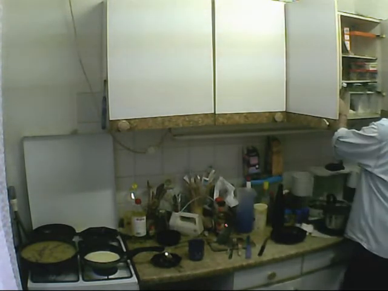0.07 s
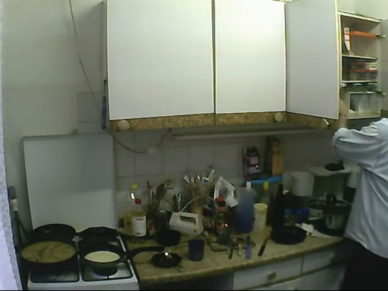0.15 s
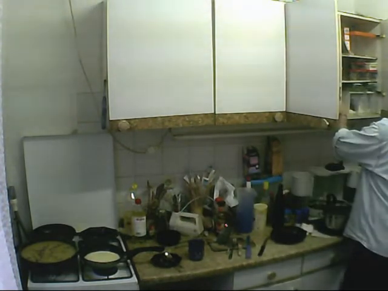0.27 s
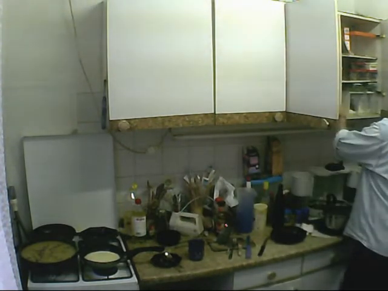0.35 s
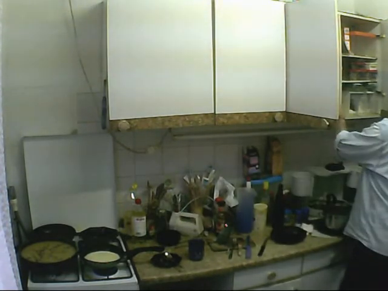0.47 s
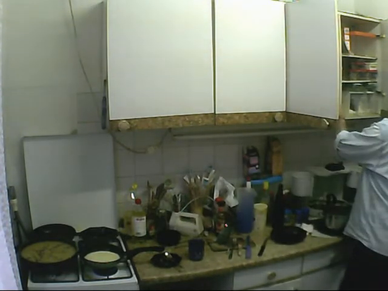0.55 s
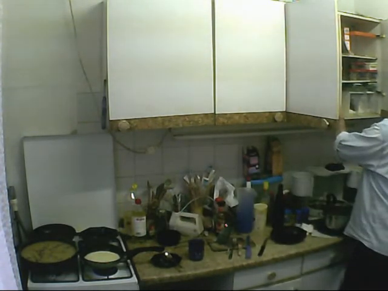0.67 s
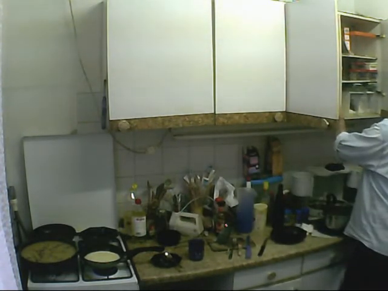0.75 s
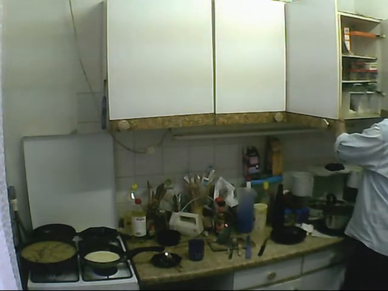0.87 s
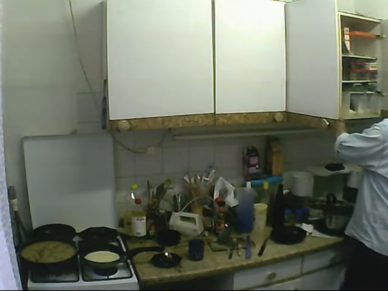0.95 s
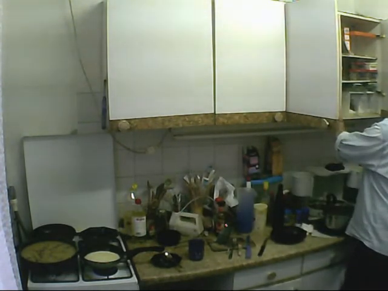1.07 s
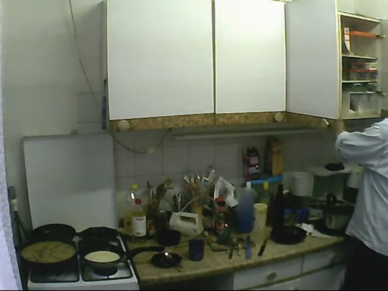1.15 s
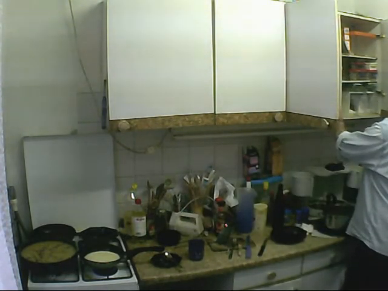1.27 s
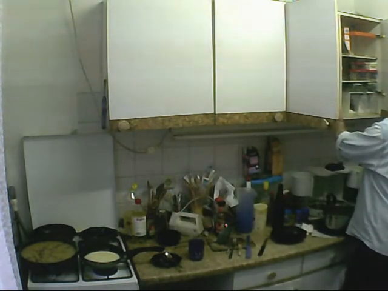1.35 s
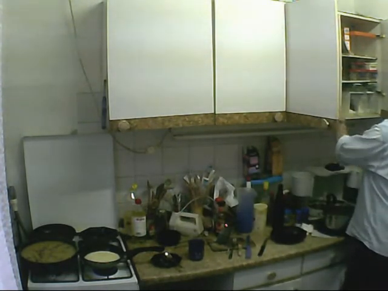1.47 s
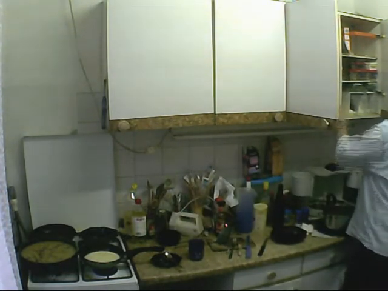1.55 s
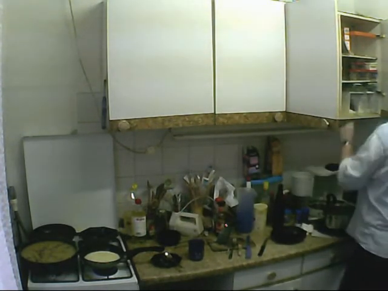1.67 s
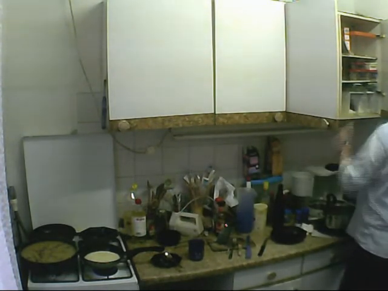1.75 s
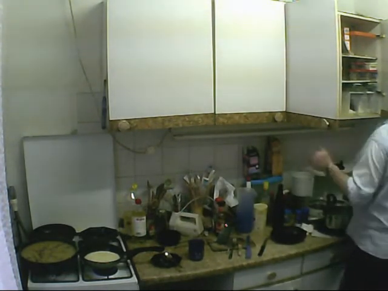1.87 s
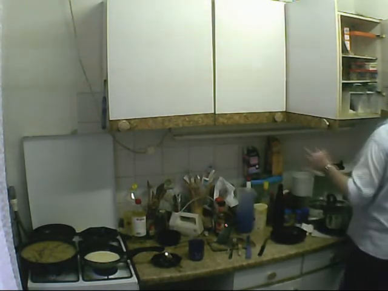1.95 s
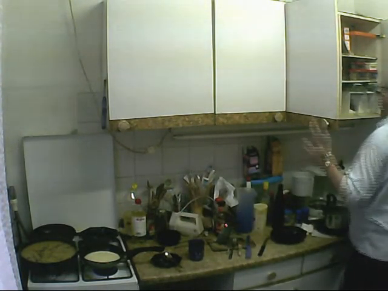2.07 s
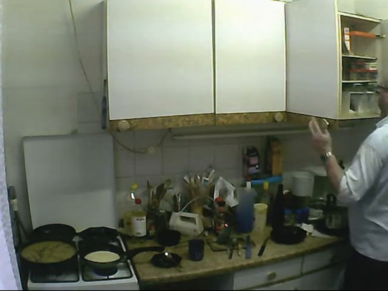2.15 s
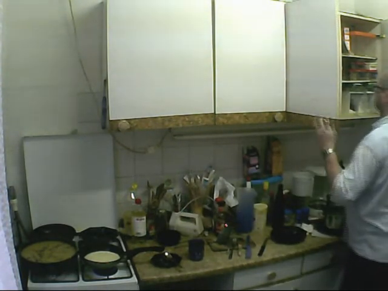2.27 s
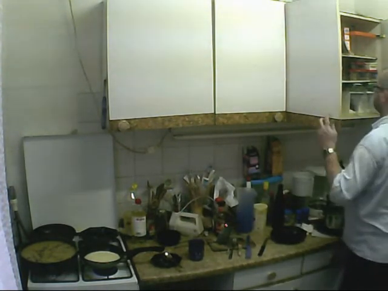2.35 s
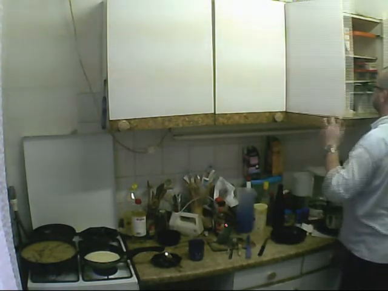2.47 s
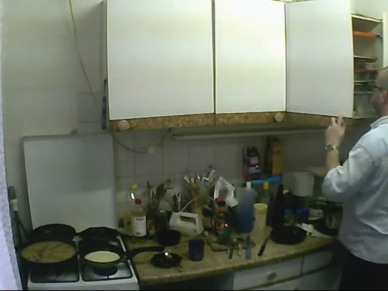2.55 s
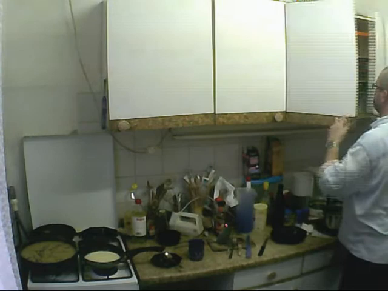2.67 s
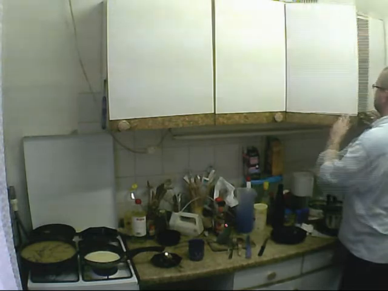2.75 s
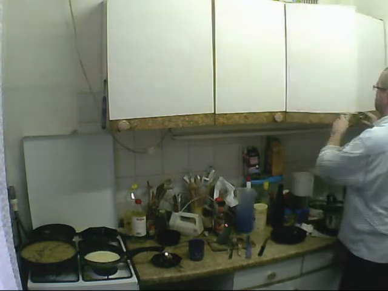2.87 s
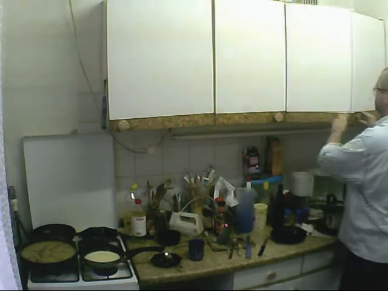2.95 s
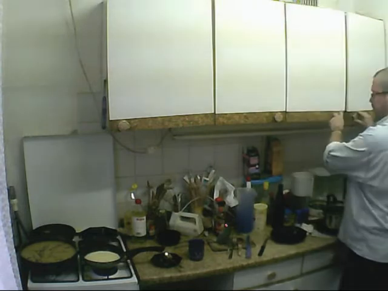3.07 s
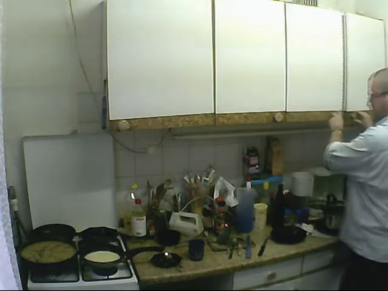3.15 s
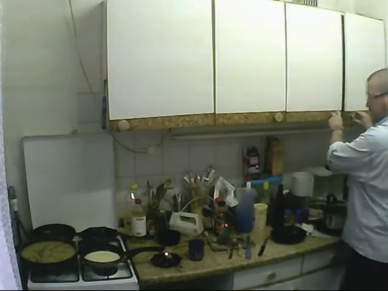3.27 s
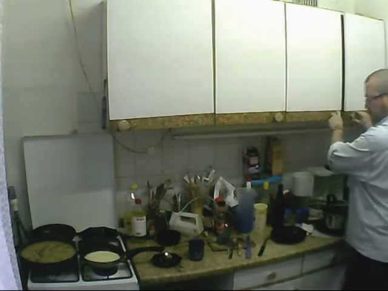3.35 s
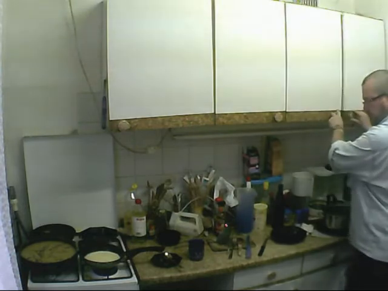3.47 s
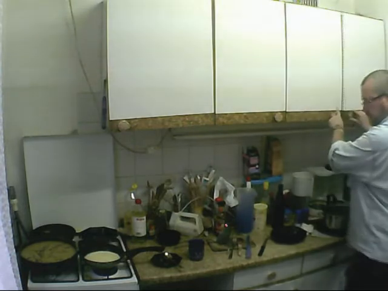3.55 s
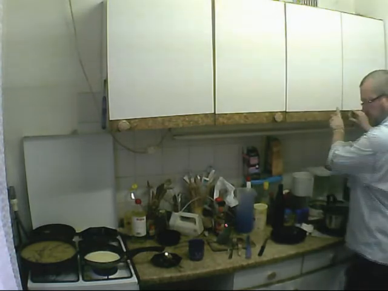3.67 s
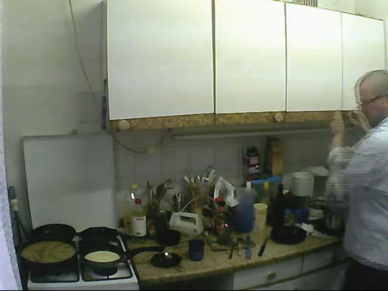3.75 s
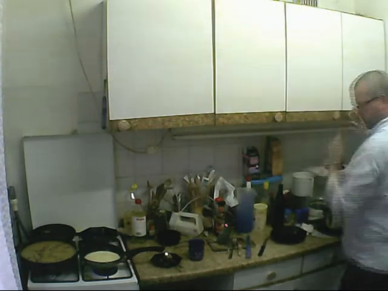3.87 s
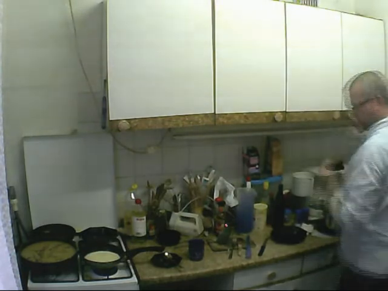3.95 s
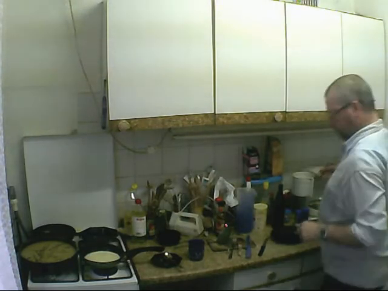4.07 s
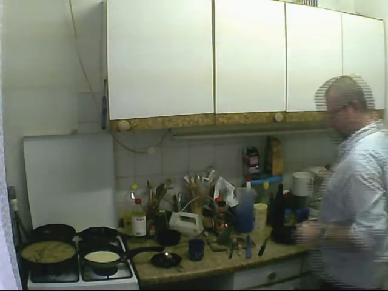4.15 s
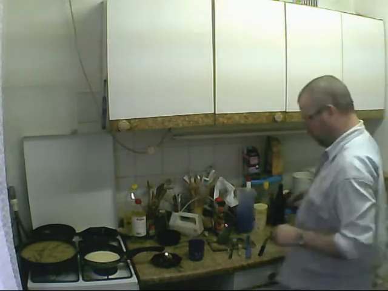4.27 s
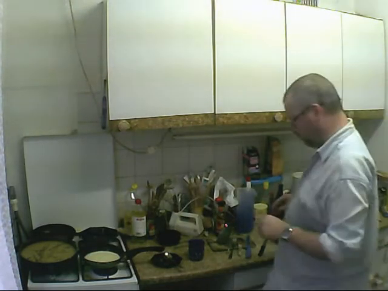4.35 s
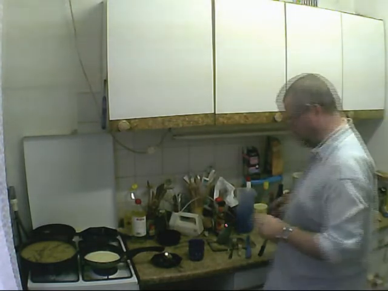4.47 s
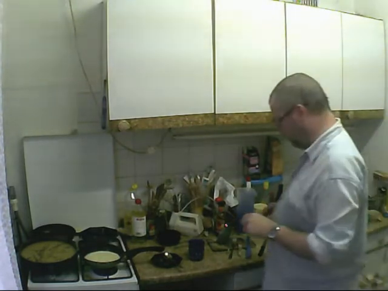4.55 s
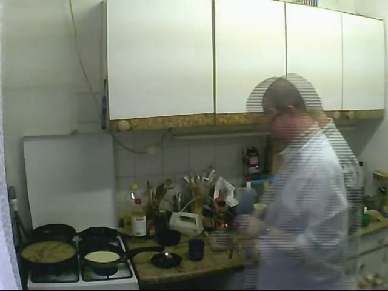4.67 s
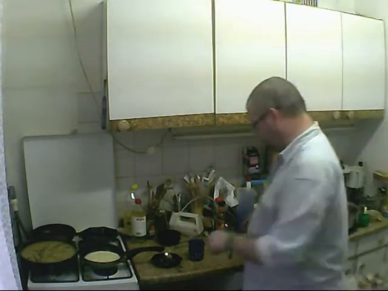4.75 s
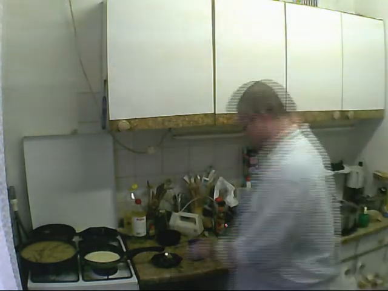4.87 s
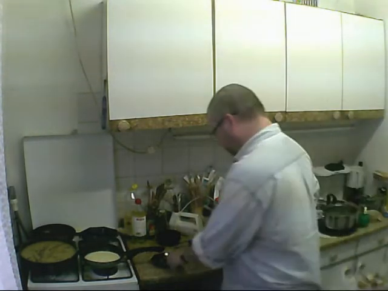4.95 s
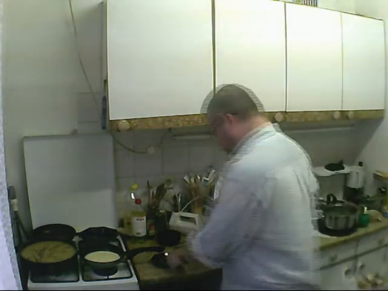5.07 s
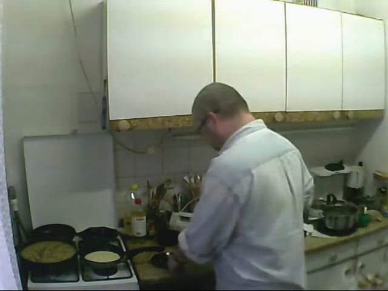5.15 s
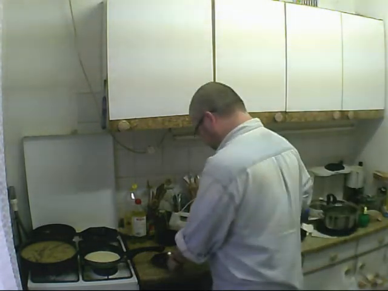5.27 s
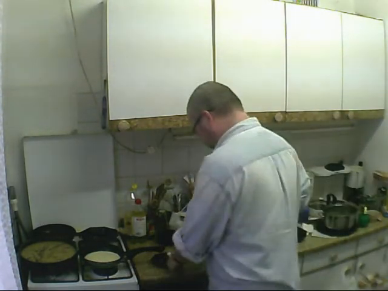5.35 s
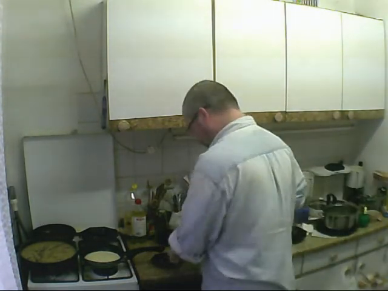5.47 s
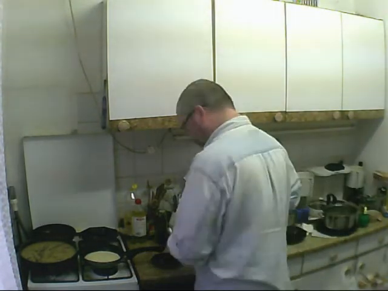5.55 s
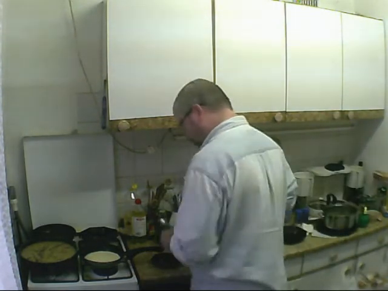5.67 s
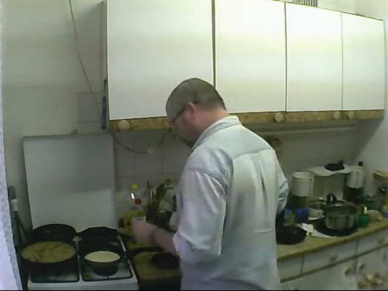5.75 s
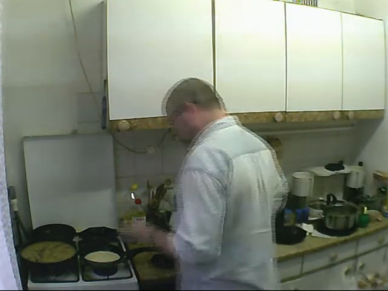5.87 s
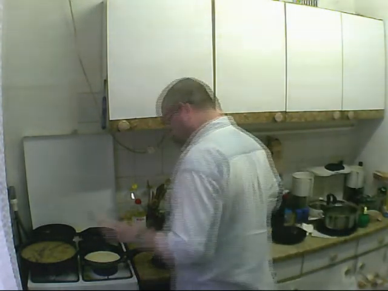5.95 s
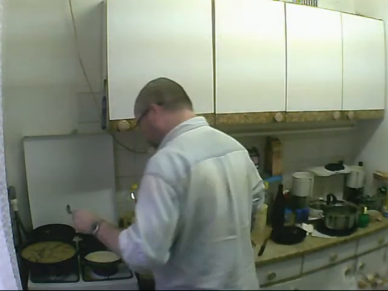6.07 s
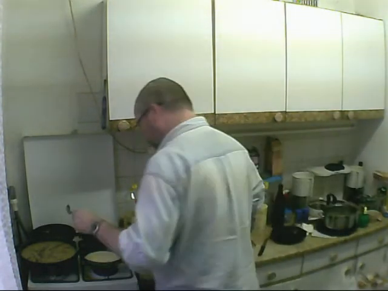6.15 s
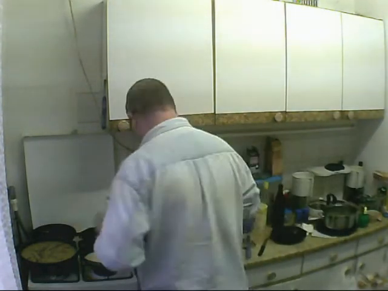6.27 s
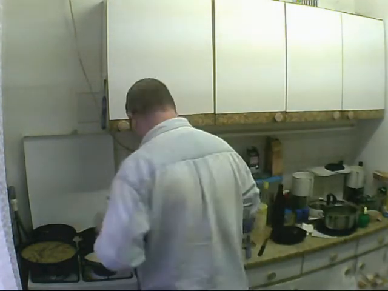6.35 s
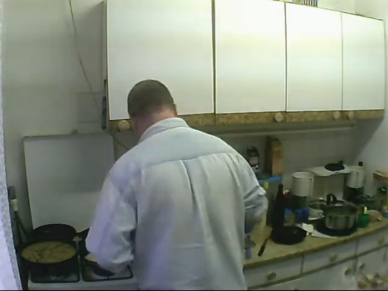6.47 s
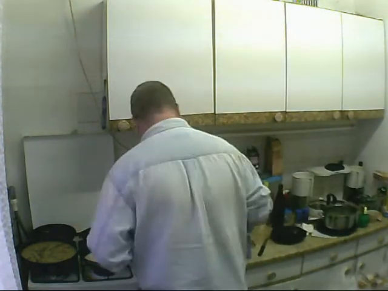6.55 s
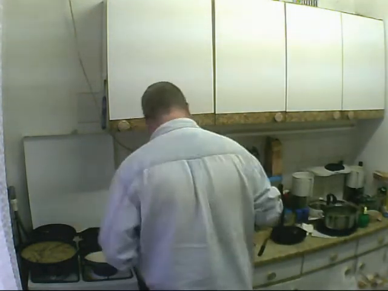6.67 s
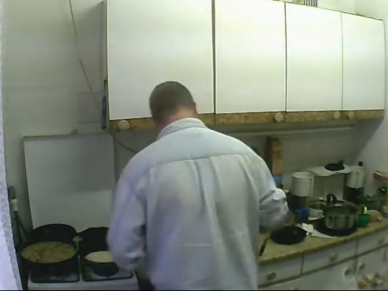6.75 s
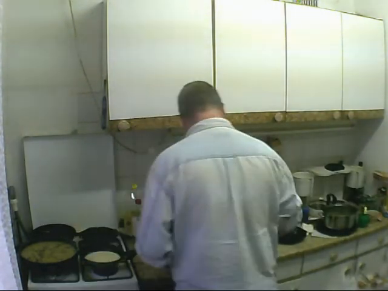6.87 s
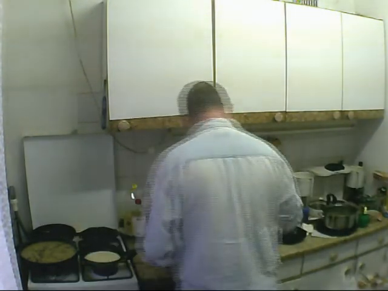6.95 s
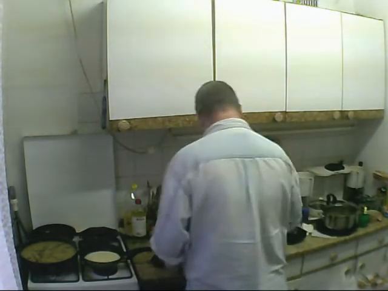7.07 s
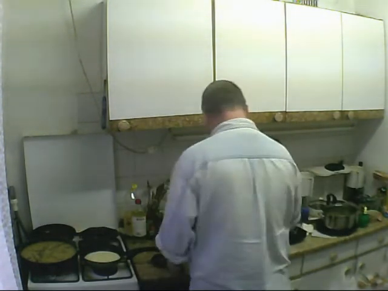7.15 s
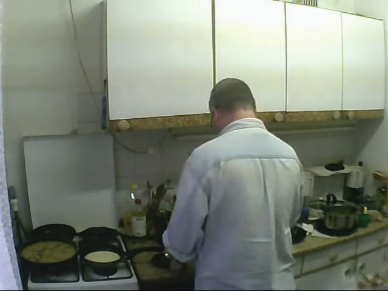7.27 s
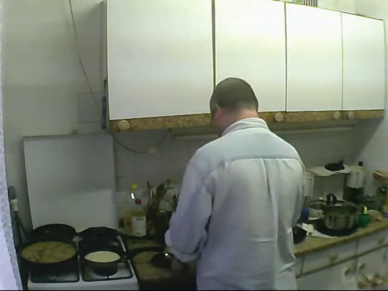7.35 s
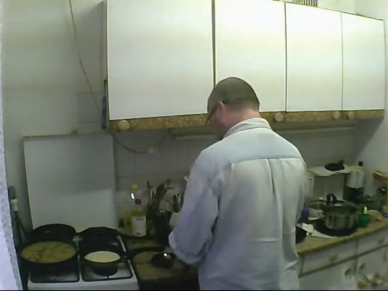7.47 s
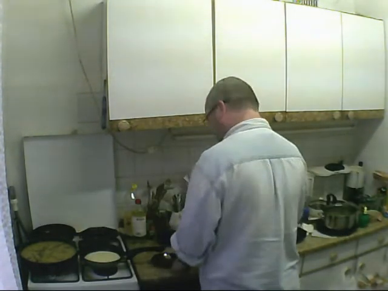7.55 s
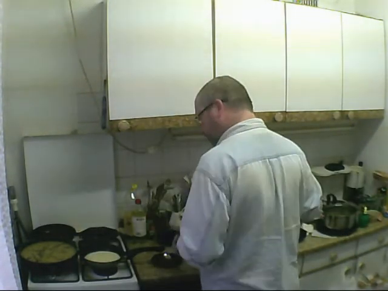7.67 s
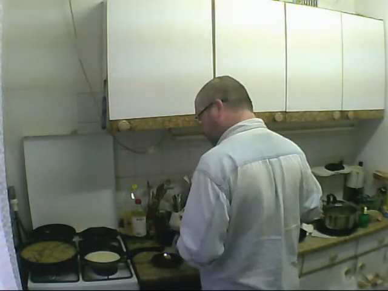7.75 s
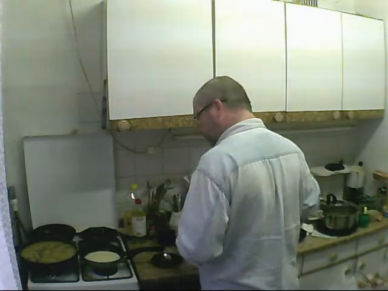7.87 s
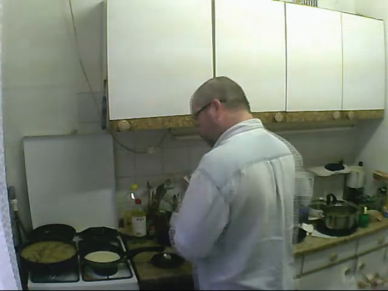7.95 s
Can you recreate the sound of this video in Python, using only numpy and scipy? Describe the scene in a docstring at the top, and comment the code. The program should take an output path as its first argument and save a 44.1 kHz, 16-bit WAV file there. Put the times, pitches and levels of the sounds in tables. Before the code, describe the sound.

In a small kitchen, things knock and slide lightly on a wooden shelf. Cupboard doors are nudged, then two bang shut in quick succession, the second loudest, with a brief crunch. Soft footsteps rumble through the floor and a shirt rustles while items knock on the counter, a glass clinks and a utensil clinks twice. The microphone sounds dull, with a steady mains hum and faint hiss.

```python
"""Two wall cupboard doors are nudged and banged shut in a small tiled kitchen; their panels thump and ring.
Before that, things knock and slide on a shelf. Afterwards things are handled on the counter, and a glass
and a utensil clink. Steps make the floor rumble, a shirt rustles and slams rock the microphone's support.
The microphone hums with the mains and misses the high treble. The hardest slam clips with a brief crunch."""
import sys
import numpy as np
from scipy import signal
from scipy.fft import rfft, irfft
from scipy.io import wavfile

SR = 44100
rng = np.random.default_rng(int(sys.argv[2]) if len(sys.argv) > 2 else 0)


def store_pcm(level_fs):
    """Save levels as 16-bit WAV."""
    pcm = np.round(np.clip(level_fs, -1, 1) * 32767).astype(np.int16)
    wavfile.write(sys.argv[1], SR, np.atleast_2d(pcm).T)


N = 352800
T = np.arange(N) / SR
AGE = T[:SR]  # seconds since a blow
TAP_S = .01  # length of a plain tap
BAND_HZ = 4500  # top of the microphone's range

# Mains hum. Each row: multiple of the mains frequency, level in dB.
HUM = [(1, -38), (3, -50.5), (5, -60)]
# Body movements, and pushes along the shelf. Each row: start in seconds, length in seconds, level in dB.
BODY_MOVES = [(.9, 3.8, -64.5), (3.5, 1.24, -53), (4.5, 1.92, -58), (6.2, 0.96, -57.5)]
PUSHES = [(.76, 0.14, -51.5), (.9, 0.2, -47)]
# Knocks on wood. Each row: start in seconds, wood level in dB, click level in dB, contact in seconds.
SHELF_KNOCKS = [(.238, -25.5, -48.5, 0.0023), (.252, -27, -69, 0.0044), (.341, -43, -53.5, 0.014),
                (2.295, -51, -83, .008), (2.383, -37, -50.5, 0.02)]
COUNTER_KNOCKS = [(3.889, -38, -38.5, 0.0041), (3.985, -50.5, -48.5, 0.045), (4.11, -57, -50, 0.05),
                  (4.336, -44.5, -53.5, .0036), (4.59, -45, -61.5, 0.0083), (4.637, -37.5, -40, 0.0079),
                  (5.153, -38, -48.5, 0.019), (6.036, -46, -61.5, 0.0042), (6.446, -49, -66, 0.069),
                  (6.504, -35.5, -53, 0.005), (7.162, -52.5, -56, .006)]
# Bumps on a container. Each row: start in seconds, level in dB, contact in seconds.
CONTAINER_KNOCKS = [(1.13, -47.5, .004), (1.568, -47, 0.0069)]
# Door blows. Each row: start in seconds, thump, wood and latch levels in dB, contact in seconds,
# which door (0 or 1).
DOOR_BLOWS = [(2.094, -36, -51, -60, 0.049, 0), (2.13, -36.5, -43, -41.5, 0.016, 0),
              (2.6, -25, -43, -45, 0.027, 0), (2.637, -29, -39.5, -47, 0.017, 0),
              (2.775, -26, -39, -47.5, 0.01, 0), (2.8, -30, -41, -46, 0.0037, 0),
              (3.092, -12.5, -17, -22.5, 0.0093, 0), (3.148, -34.5, -28, -38, .006, 0),
              (3.312, -34.5, -45.5, -50.5, 0.0065, 1), (3.383, -28, -36.5, -33, .008, 1),
              (3.402, -5.5, -14.5, -21, 0.0083, 1), (3.428, -27.5, -20.5, -33, 0.0098, 1),
              (3.61, -33, -46, -63, .003, 1)]
# First hard touch of a door's edge, the glass and the utensil. Each row: start in seconds, level in dB.
SNAPS = [(3.0969, -24), (5.2075, -31), (6.834, -41)]
# Footsteps. Each row: start in seconds, thud level in dB, rumble level in dB.
STEPS = [(3.93, -53, -28), (4.632, -43, -22), (5.124, -46, -34.5), (5.83, -45.5, -31.5), (6.506, -42, -36)]
# Clinks. Each row: start in seconds, ring and scrape levels in dB, contact in seconds,
# brightness in dB per octave.
GLASS_CLINKS = [(5.198, -33, -30, 0.03, -1.5)]
UTENSIL_CLINKS = [(6.828, -32, -27.5, 0.0042, 5.5), (7.241, -38.5, -39.5, 0.011, -3.0)]

# Modes, the tones a struck thing rings with.
# Each row: pitch in Hz, relative level in dB, seconds to fade by 60 dB.
SHELF_MODES = [(175, -12, .16), (213, -9, .15), (255, -13, .16), (380, 0, .15), (554, 2, .24),
               (585, -4, .16), (665, -12, .13), (1020, -21, .15)]
FIRST_DOOR_MODES = [(165, -10, .3), (214, -5, .3), (252, -15, .35), (296, -11, .3), (393, -9, .25),
                    (490, -12, .25), (552, -3, .24), (630, -1, .2), (668, 3, .22), (1060, -9, .18),
                    (1660, -17, .22)]
SECOND_DOOR_MODES = [(160, -13, .22), (252, -14, .3), (320, -15, .18), (392, -12, .2), (503, -9, .22),
                     (554, -7, .17), (660, -5, .16), (701, 3, .18), (772, -14, .2), (1010, -14, .17),
                     (1277, -17, .25), (1660, -18, .22)]
COUNTER_MODES = [(211, 5, 0.11), (253.5, -10, 0.41), (396, 3, 0.057), (440.7, -4.5, 0.2), (574, -7, 0.24),
                 (675, -5, 0.11), (1370, -22, 0.61)]
GLASS_MODES = [(1292, -11, .32), (1760, -5, .15), (1954, -9, .34), (2169, -9, .22), (2600, 0, .44),
               (3338, -4, .16), (3650, -3, .12), (4032, 1, .23), (4550, -4, .15), (5399, 6, .48)]
UTENSIL_MODES = [(1870, -4, .13), (1965, -1, .23), (2680, -7, .38), (3240, -6, .2), (3607, -1, .24),
                 (3740, -1, .18), (3970, 1, .24), (4165, 0, .2), (4400, -3, .17)]

# The tone colour of each noise. Each row: frequency in Hz, relative level in dB.
HISS_COLOUR = [(22, 18), (45, -11.5), (80, 5), (130, 5), (300, -6), (450, 0.5), (680, -15), (950, -11),
               (1300, -8), (1700, -18), (2600, -16.5), (4000, -22), (5000, -13)]
CLOTH_COLOUR = [(120, 2.5), (260, 0), (450, -4.5), (660, 5), (900, -10.5), (1400, -13.5), (2100, -17),
                (3000, -12.5), (5000, -27.5)]
CLICK_COLOUR = [(400, -22), (900, -6.5), (1350, 0.5), (1700, 0), (2050, 3.5), (2500, -5.5), (3200, -1.5),
                (4200, -8.5), (5200, -2)]
SCRAPE_COLOUR = [(600, -25), (1300, -9.5), (1900, -3.5), (2400, -5.5), (3300, 1.5), (4100, -7.5),
                 (5200, 3.5)]
FLOOR_COLOUR = [(12, 1), (30, -7), (60, -23.5), (300, -90.5)]
# Modes so crowded that they sound like noise. Each row: frequency in Hz, relative level in dB.
WOOD_COLOUR = [(90, -23), (160, 1), (250, 5.5), (330, -4.5), (480, -3), (660, 5), (830, -20), (1100, -26),
               (1500, -24.5), (2500, -40.5)]
CONTAINER_COLOUR = [(350, 3), (700, 3.5), (950, -9.5), (1400, -6.5), (1750, -5), (2300, -16.5), (4500, -25)]
PANEL_COLOUR = [(115, -5), (165, -4.5), (240, 1.5), (330, -12), (480, -6.5), (660, 3), (830, -9),
                (1100, -19), (1500, -20.5), (2500, -32.5)]


def undb(db):
    """Turn decibels into a gain."""
    return 10 ** (np.asarray(db) / 20)


def fade(t60, hold_s=0):
    """Stay level for hold_s seconds, then fall 60 dB every t60 seconds."""
    return np.exp(-np.log(1000) * np.maximum(AGE - hold_s, 0) / t60)


def onset(rise_s):
    """Rise smoothly from silence."""
    return 1 - np.exp(-(AGE / rise_s) ** 2)


def at_level(x, db):
    """Scale a sound so that its first 40 ms have this average (rms) level."""
    head = x[:SR // 25]
    return x * undb(db) / np.sqrt(np.mean(head ** 2))


def noise(colour, size):
    """Noise of strength 1 with the given colour, falling away at both ends."""
    hz, db = np.transpose(colour)
    f = np.maximum(np.fft.rfftfreq(size, 1 / SR), 1)
    gain = undb(np.interp(np.log(f), np.log(hz), db))
    gain *= np.minimum(f / hz[0], 1) ** 2 / (1 + (f / (2 * BAND_HZ)) ** 10)
    x = irfft(rfft(rng.standard_normal(size)) * gain, size)
    return x / x.std()


def add(out, start_s, x):
    """Mix x into out at the given time."""
    i = int(start_s * SR)
    out[i:i + len(x)] += x[:N - i]


def resonate(modes, x, width_hz):
    """Let x set an object's modes sounding."""
    return sum(undb(db) * signal.lfilter(*signal.iirpeak(hz, hz / width_hz, fs=SR), x)
               for hz, db, _ in modes)


def gestures(table, attack_s, release_s):
    """Strength of hand or body movements: each swells, holds and dies away."""
    out = np.zeros(N)
    for start_s, length_s, db in table:
        swell = np.clip((T - start_s) / attack_s, 0, 1)
        release = np.clip((start_s + length_s - T) / release_s + .5, 0, 1)
        out += undb(db) * swell * release
    return out


def shirt_rustle(still_db=-61.5):
    """A shirt's folds rustle unevenly, more so when the body moves."""
    folds_db = 3.4 * np.interp(T, np.linspace(0, T[-1], 160), rng.standard_normal(160))
    motion = np.hypot(undb(still_db), gestures(BODY_MOVES, attack_s=0.33, release_s=0.47))
    return noise(CLOTH_COLOUR, N) * motion * undb(folds_db)


def background(mains_hz=50, hiss_db=-54, flutter_hz=62.5):
    """Mains hum, plus faint hiss and rustle that share a quick, even flutter."""
    hum = sum(np.sqrt(2) * undb(db) * np.cos(2 * np.pi * round(k) * mains_hz * T) for k, db in HUM)
    rustle = shirt_rustle()
    hiss = noise(HISS_COLOUR, N) * undb(hiss_db)
    flutter = 1 + 0.35 * np.sin(2 * np.pi * flutter_hz * T)
    return hum + (hiss + rustle) * flutter


def ring(modes, contact_s, partner_gain=1.0, split_hz=9, build_cycles=3.1):
    """Modes swell during contact, the low ones last; each wavers against a partner close in pitch."""
    out = 0
    for hz, db, t60 in modes:
        phase, partner_phase = rng.uniform(0, 2 * np.pi, 2)
        partner_hz = hz + split_hz * rng.standard_normal()
        tone = np.sin(2 * np.pi * hz * AGE + phase)
        partner = partner_gain * np.sin(2 * np.pi * partner_hz * AGE + partner_phase)
        rise_s = build_cycles / hz + 0.62 * contact_s
        out += undb(db) * (tone + partner) * fade(t60, contact_s / 2) * onset(rise_s)
    return out


def clatter(colour, contact_s, t60, room_db, room_t60=0.37, grain_db=4.5):
    """Touching surfaces feed crowded modes in uneven grains; the room adds a smooth tail."""
    grains = undb(grain_db * np.repeat(rng.standard_normal(SR // 63), 63))
    direct = noise(colour, SR) * grains * fade(t60, contact_s) * onset(.0015 + 0.38 * contact_s)
    room = noise(colour, SR) * fade(room_t60, contact_s) * onset(0.005)
    return direct + undb(room_db) * room


def thump(low_hz=86, high_hz=108):
    """A whole board flexes for a few cycles and sets the small room booming."""
    flex = np.sin(2 * np.pi * low_hz * AGE) + undb(-7) * np.sin(2 * np.pi * high_hz * AGE)
    boom = undb(-9) * noise([(50, -2.5), (80, -7.0), (115, -2.5), (170, -28.5), (600, -65.0)], SR)
    return flex * onset(0.0071) * fade(0.14, hold_s=0.017) + boom * onset(0.024) * fade(0.33)


def with_thump(table, offset_db, db_per_doubling=8.5):
    """Give each knock a thump level: a harder or longer push flexes the board more."""
    blows = []
    for start_s, wood_db, click_db, contact_s in table:
        thump_db = wood_db + offset_db + db_per_doubling * np.log2(contact_s / TAP_S)
        blows.append((start_s, thump_db, wood_db, click_db, contact_s))
    return blows


def knocks(blows, modes, colour, clatter_db, t60, room_db, soft_tilt):
    """Each blow flexes a board and rings its modes under a short click."""
    out = np.zeros(N)
    hardest_db = max(row[2] for row in blows)
    for start_s, thump_db, wood_db, click_db, contact_s in blows:
        # a gentler blow is a softer push, which favours the low modes
        tilt = soft_tilt * (wood_db - hardest_db)
        struck = [(hz, db + tilt * np.log2(hz / modes[0][0]), decay) for hz, db, decay in modes]
        wood = at_level(ring(struck, contact_s), 0)
        wood += at_level(clatter(colour, contact_s, t60, room_db), clatter_db)
        click = at_level(clatter(CLICK_COLOUR, contact_s, t60, room_db), click_db)
        add(out, start_s, at_level(thump(), thump_db) + at_level(wood, wood_db) + click)
    return out


def shelf_knocks():
    """Things set down or bumped make the shelf knock hollowly."""
    blows = with_thump(SHELF_KNOCKS, offset_db=-7)
    return knocks(blows, SHELF_MODES, WOOD_COLOUR, clatter_db=-5.5, t60=0.3, room_db=-7, soft_tilt=0.062)


def shelf_slide():
    """Something pushed along the shelf grips and slips, keeping the wood sounding."""
    slips = rng.standard_normal(N) ** 3  # cubing makes a few slips stand out
    wood = resonate(SHELF_MODES, slips, width_hz=14)
    return wood / wood.std() * gestures(PUSHES, attack_s=0.072, release_s=0.094)


def container():
    """A light container bumped in the cupboard gives a short, dry tock."""
    out = np.zeros(N)
    for start_s, db, contact_s in CONTAINER_KNOCKS:
        tock = clatter(CONTAINER_COLOUR, contact_s, t60=0.12, room_db=-7)
        add(out, start_s, at_level(tock, db))
    return out


def doors():
    """Two doors bump and bang against the wooden cupboard and rattle their latches."""
    out = np.zeros(N)
    for door, modes in enumerate([FIRST_DOOR_MODES, SECOND_DOOR_MODES]):
        blows = [row[:-1] for row in DOOR_BLOWS if round(row[-1]) == door]
        out += knocks(blows, modes, PANEL_COLOUR, clatter_db=-3, t60=0.21, room_db=-6, soft_tilt=0.33)
    return out


def support_sway(sway_hz=28, offset_db=-6.5, limit_db=-19.5):
    """The microphone's support rocks after each door blow."""
    out = np.zeros(N)
    sway = np.sin(2 * np.pi * sway_hz * AGE) * onset(TAP_S) * fade(0.87)
    for start_s, thump_db, *_ in DOOR_BLOWS:
        add(out, start_s, at_level(sway, min(thump_db + offset_db, limit_db)))
    return out


def snaps():
    """The hardest contacts arrive as a bright crack ahead of the room's echo."""
    out = np.zeros(N)
    for start_s, db in SNAPS:
        add(out, start_s, at_level(noise(SCRAPE_COLOUR, SR) * fade(0.016), db))
    return out


def counter_knocks(lag_s=.006):
    """Things knock on the counter, or scrape if the contact is long; whatever clinks knocks on it too."""
    blows = with_thump(COUNTER_KNOCKS, offset_db=-22.5)
    for start_s, ring_db, _, contact_s, _ in GLASS_CLINKS + UTENSIL_CLINKS:
        thump_db, wood_db, click_db = ring_db - 23, ring_db - 6, ring_db - 14
        blows.append((start_s + lag_s, thump_db, wood_db, click_db, contact_s))
    return knocks(blows, COUNTER_MODES, WOOD_COLOUR, clatter_db=4, t60=0.2, room_db=1, soft_tilt=0.095)


def footsteps():
    """Soft steps: a dull knock of the heel over a thud of the floor."""
    out = np.zeros(N)
    for start_s, thud_db, _ in STEPS:
        heel = clatter(WOOD_COLOUR, contact_s=.02, t60=0.39, room_db=-4)
        add(out, start_s, at_level(thump(), thud_db) + at_level(heel, thud_db - 6))
    return out


def floor_rumble():
    """The floor rumbles under the weight of each step."""
    out = np.zeros(N)
    for start_s, _, db in STEPS:
        add(out, start_s, undb(db) * noise(FLOOR_COLOUR, SR) * onset(TAP_S) * fade(0.87, hold_s=0.14))
    return out


def clinks(table, modes, room_db, echo_db, t60=0.26):
    """A hard object skids briefly and rings on; the tiled walls throw its tones back blurred."""
    out = np.zeros(N)
    for start_s, ring_db, scrape_db, contact_s, tilt in table:
        struck = [(hz, db + tilt * np.log2(hz / modes[0][0]), decay) for hz, db, decay in modes]
        blurred = resonate(struck, rng.standard_normal(SR), width_hz=60)
        echo = at_level(blurred * onset(0.005) * fade(t60, contact_s), echo_db)
        tones = at_level(ring(struck, contact_s, partner_gain=0.41, split_hz=14), 0)
        scrape = clatter(SCRAPE_COLOUR, contact_s, t60, room_db)
        add(out, start_s, at_level(tones + echo, ring_db) + at_level(scrape, scrape_db))
    return out


def scene():
    """All the kitchen's sounds, mixed into one channel."""
    shelf = shelf_knocks() + shelf_slide()
    counter = counter_knocks()
    glass = clinks(GLASS_CLINKS, GLASS_MODES, room_db=-29, echo_db=-6.5)
    utensil = clinks(UTENSIL_CLINKS, UTENSIL_MODES, room_db=-18, echo_db=4)
    objects = doors() + shelf + container() + counter + glass + utensil + snaps()
    return (objects + footsteps() + floor_rumble() + support_sway() + background())[None]


def record(dry, casing_hz=2010, casing_width_hz=33, dulling_hz=5600, top_hz=16000):
    """The microphone's casing rings faintly and the high treble is lost.
    The loudest peaks are cut flat and the harsh edge is dulled."""
    casing = signal.lfilter(*signal.iirpeak(casing_hz, casing_hz / casing_width_hz, fs=SR), dry)
    narrow = signal.sosfilt(signal.butter(20, BAND_HZ, fs=SR, output="sos"), dry + 1.8 * casing)
    clipped = np.clip(narrow, -1, 1)
    dulled = signal.lfilter(*signal.butter(1, dulling_hz, fs=SR), clipped)
    return signal.sosfilt(signal.ellip(8, .1, 70, top_hz, fs=SR, output="sos"), dulled)


dry = scene()
out = record(dry)
store_pcm(out)
```